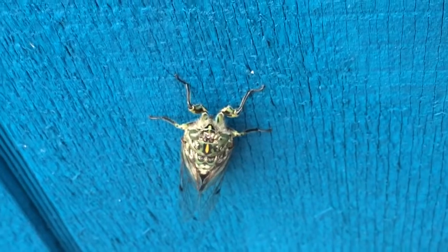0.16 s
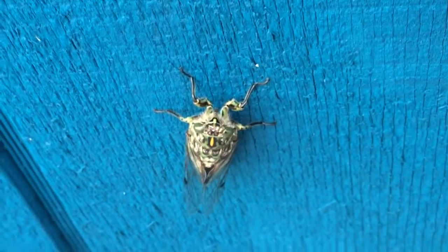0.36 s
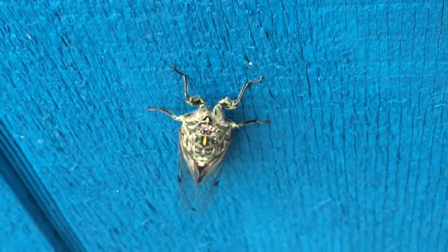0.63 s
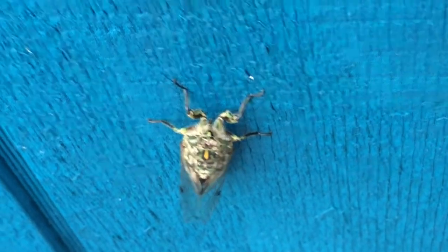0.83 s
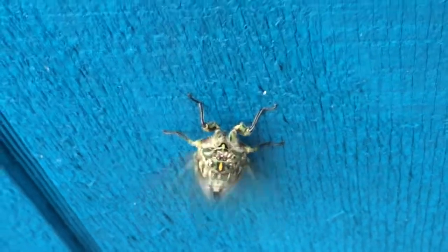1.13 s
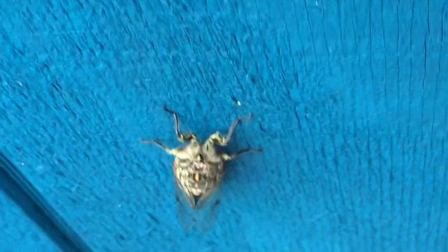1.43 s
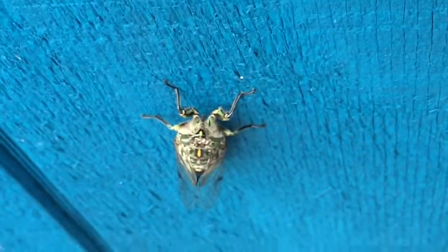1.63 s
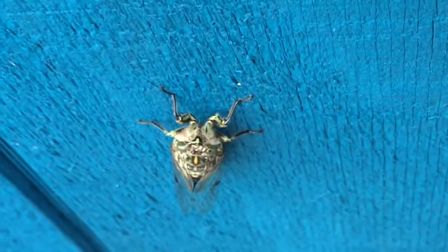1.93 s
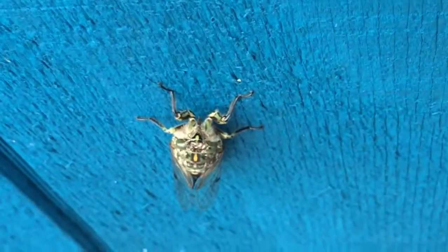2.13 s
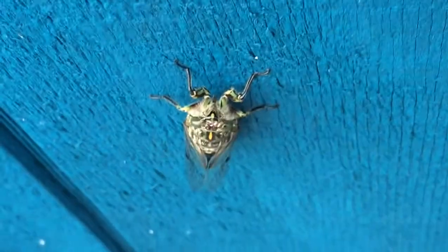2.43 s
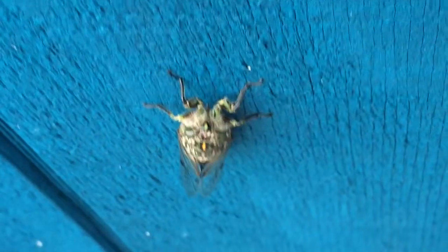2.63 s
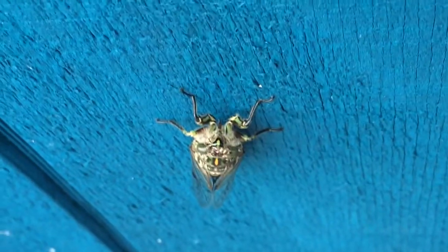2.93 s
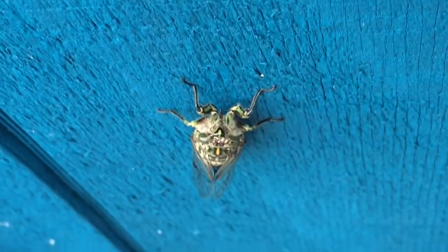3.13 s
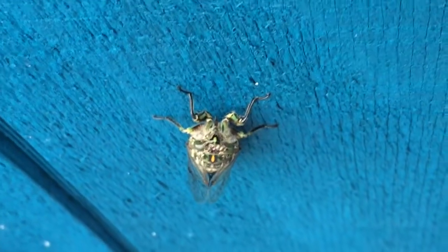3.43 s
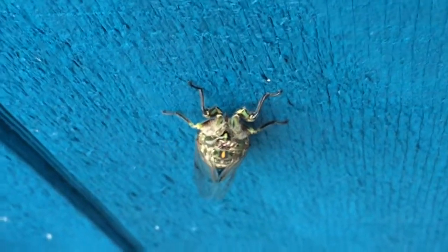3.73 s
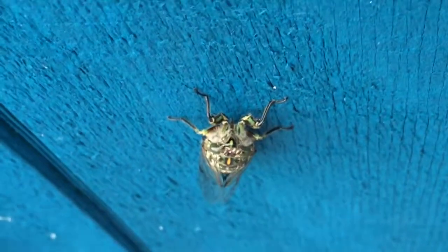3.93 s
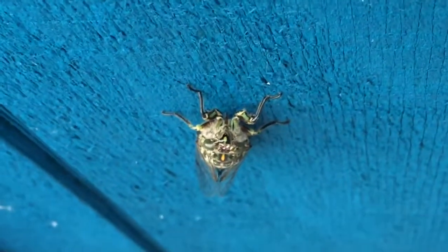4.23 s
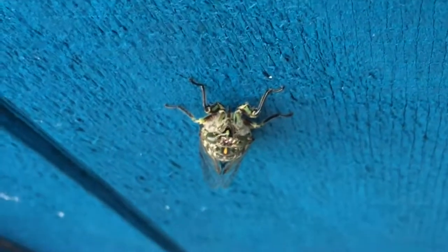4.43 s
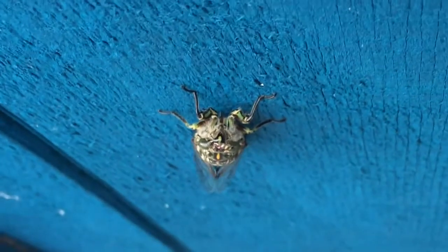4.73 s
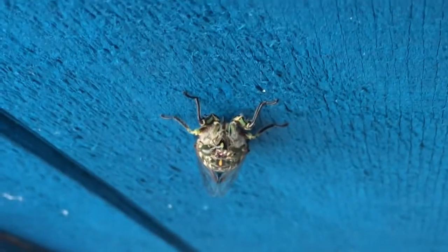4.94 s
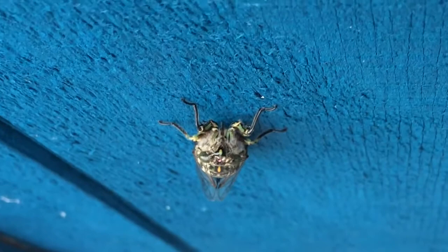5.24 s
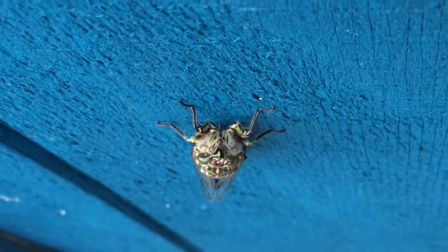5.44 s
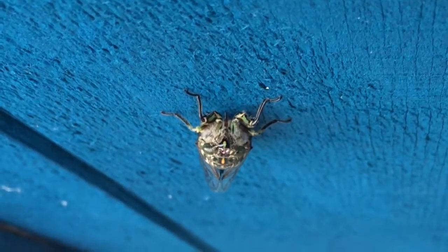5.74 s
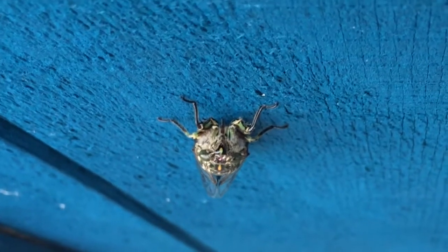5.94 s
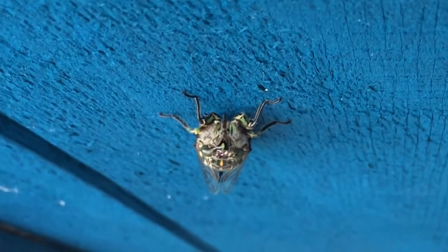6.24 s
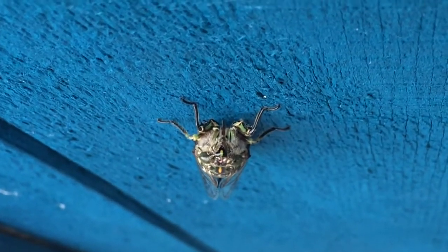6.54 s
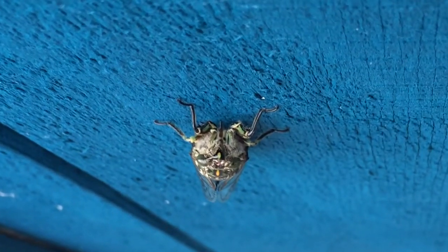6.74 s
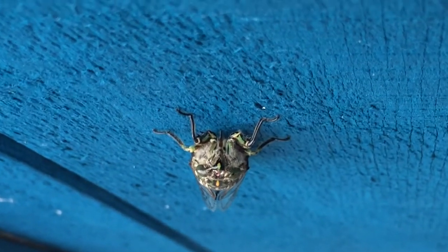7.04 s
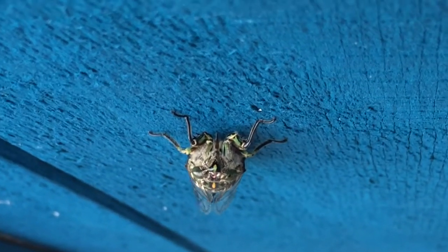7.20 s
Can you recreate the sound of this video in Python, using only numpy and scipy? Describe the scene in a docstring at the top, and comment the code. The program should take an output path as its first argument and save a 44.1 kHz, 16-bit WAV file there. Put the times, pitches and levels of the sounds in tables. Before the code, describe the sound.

Close, shrill cicada song repeats about once a second, rapid ticking building to a short buzz over faint outdoor hiss.

```python
"""Outdoors on a painted board, a cicada sings close to a small microphone, over low air and a far chorus.
Each muscle stroke buckles five tymbal ribs in turn; the clicks ring the air sac, whose pitch climbs as
the abdomen lifts. A phrase builds from lone strokes through runs of mostly three to one long roll, and
the wings flick at its start. A hand bumps the microphone twice; its sound bends under the loud clicks."""
import sys
import numpy as np
from scipy import signal
from scipy.fft import rfft, irfft
from scipy.io import wavfile

SR = 44100
rng = np.random.default_rng(int(sys.argv[2]) if len(sys.argv) > 2 else 0)


def dump(signal):
    """Clip the signal to [-1, 1] and save it as 16-bit WAV at the path in sys.argv[1]."""
    limited = np.clip(np.atleast_2d(signal).T, -1, 1)
    pcm = np.round(limited * 32767).astype(np.int16)
    wavfile.write(sys.argv[1], SR, pcm)


N = 325017

# The colour of the outdoor air. Each row: frequency in Hz, relative spectral level in dB.
AIR_SPECTRUM = [(20, -5), (50, 5), (90, -0.5), (180, -1), (800, -6), (2150, -10), (3400, -42), (5000, -22)]
# Muscle strokes that stand alone. Each row: start in seconds, relative level in dB.
LONE_STROKES = [(0.0106, -13), (0.0356, -11.5), (0.052, -7.0), (0.0749, -10.5), (0.0941, -12.5),
                (0.115, -12), (0.1362, -10), (0.1567, -9.5), (0.1772, -8.5), (0.1971, -9), (0.2176, -7.5),
                (0.238, -8.5), (0.2575, -8.5), (0.2775, -9.0), (0.2991, -7.5), (0.3182, -7.5), (0.3378, -7),
                (0.3585, -10), (0.3751, -7.5), (1.2179, -8.5), (1.2541, -9), (1.2805, -11.5),
                (1.3031, -9.0), (1.323, -8.5), (1.3422, -11), (1.3659, -11), (1.3883, -8.5), (1.407, -11),
                (1.4291, -10.5), (1.4507, -9), (1.4711, -9.5), (1.4912, -10), (1.5135, -9.5),
                (1.5329, -7.5), (1.5533, -9.5), (1.575, -8.5), (1.589, -7.0), (2.3125, -8.5),
                (2.3448, -6.5), (2.3646, -12.0), (2.3908, -11), (2.4101, -9.5), (2.4346, -8),
                (2.4537, -10.0), (2.4717, -11.5), (2.4915, -10.5), (2.5121, -10), (2.5326, -8.5),
                (2.5522, -10), (2.5733, -8.5), (2.5933, -7), (2.6126, -7.5), (2.634, -9.5), (2.6561, -8.0),
                (2.6767, -7), (2.6941, -9.0), (2.7164, -7.5), (3.568, -8.5), (3.6001, -10), (3.624, -13.0),
                (3.65, -11.5), (3.6702, -7.0), (3.6876, -10), (3.7075, -13), (3.73, -11.5), (3.7521, -8.5),
                (3.772, -8.5), (3.7908, -9), (3.812, -9.5), (3.8343, -8.5), (3.854, -8.5), (3.8756, -9),
                (3.8948, -7.5), (3.9145, -8.0), (4.6807, -7), (4.7028, -9), (4.7174, -8.0), (4.7418, -13.5),
                (4.7688, -10), (4.793, -9.0), (4.812, -11.5), (4.8305, -11), (4.8515, -11.5),
                (4.872, -11.0), (4.8927, -11.5), (4.9129, -8.5), (4.9319, -8.5), (4.9528, -9.5),
                (4.9735, -9.5), (4.9917, -10.5), (5.0122, -8.5), (5.0321, -8), (5.0526, -8.0), (5.0723, -8),
                (5.0897, -10.5), (5.1136, -7.5), (5.1306, -6.5), (5.1485, -8.5), (6.0899, -7.5),
                (6.1266, -8.5), (6.1514, -13.5), (6.1754, -12.0), (6.1996, -7.0), (6.2168, -9.0),
                (6.2354, -12), (6.255, -11), (6.2766, -9.5), (6.2968, -7), (6.3162, -9), (6.3361, -9),
                (6.3568, -8.0), (6.377, -8), (6.3958, -9), (6.4158, -8.5), (6.4364, -8.0), (6.4552, -7.5),
                (6.473, -8), (6.4969, -7.0), (6.5135, -7.0), (7.246, -6.5), (7.2804, -8), (7.3056, -12.5),
                (7.3318, -7), (7.356, -8)]
# Short runs and long rolls. Each row: start in seconds, number of strokes, first spacing in ms,
# later spacing in ms, relative level in dB.
STROKE_RUNS = [(0.4016, 2, 11.4, 11.0, -7.0), (0.4479, 3, 10.8, 10.6, -7.0), (0.4985, 3, 10.4, 10.6, -8.0),
               (0.5489, 3, 10.4, 10.8, -8.0), (0.6003, 3, 10.4, 10.8, -8.0), (0.6512, 3, 10.2, 10.8, -7.0),
               (0.7037, 3, 10.0, 10.8, -7.0), (0.7541, 3, 10.4, 10.8, -8.0), (0.8066, 3, 10.0, 10.6, -8.0),
               (0.8567, 3, 10.0, 10.6, -8.0), (0.9084, 3, 10.2, 10.4, -9.0),
               (0.9528, 21, 10.4, 11.07, -7.0), (1.6191, 3, 11.2, 11.4, -9.0),
               (1.6699, 3, 10.6, 10.8, -7.0), (1.7225, 3, 10.6, 10.8, -9.0), (1.7736, 3, 10.4, 10.6, -8.0),
               (1.8248, 3, 10.0, 10.8, -8.0), (1.8768, 3, 10.2, 10.6, -9.0), (1.9289, 3, 10.2, 10.4, -8.0),
               (1.9806, 3, 10.2, 10.8, -8.0), (2.0274, 23, 9.8, 11.07, -7.0), (2.7364, 2, 11.8, 11.0, -8.0),
               (2.7725, 2, 11.4, 11.0, -8.0), (2.8212, 3, 11.0, 10.8, -8.0), (2.8732, 3, 10.4, 10.8, -8.0),
               (2.9238, 3, 10.6, 10.6, -9.0), (2.9768, 3, 10.4, 10.8, -8.0), (3.0285, 3, 9.8, 10.8, -8.0),
               (3.0801, 3, 10.2, 10.8, -8.0), (3.1319, 3, 10.0, 10.6, -8.0), (3.1837, 3, 10.4, 10.6, -10.0),
               (3.2351, 3, 10.0, 10.8, -9.0), (3.2831, 23, 9.4, 11.07, -7.0), (3.9339, 2, 11.2, 11.0, -9.0),
               (3.9749, 3, 11.0, 10.8, -6.0), (4.0263, 3, 10.4, 10.6, -8.0), (4.0774, 3, 10.4, 10.8, -8.0),
               (4.129, 3, 10.4, 10.8, -8.0), (4.1809, 3, 10.2, 10.8, -8.0), (4.2324, 3, 10.2, 10.6, -8.0),
               (4.2842, 3, 10.4, 10.6, -7.0), (4.3355, 3, 10.2, 10.8, -7.0),
               (4.3822, 24, 10.0, 11.07, -7.0), (5.166, 3, 11.0, 10.0, -7.0), (5.214, 3, 10.6, 10.8, -7.0),
               (5.2655, 3, 10.4, 10.6, -8.0), (5.3173, 3, 10.4, 10.4, -8.0), (5.3679, 3, 10.4, 10.6, -7.0),
               (5.4201, 3, 10.2, 10.6, -8.0), (5.4723, 3, 10.2, 10.8, -7.0), (5.5244, 3, 10.4, 10.4, -7.0),
               (5.5776, 3, 10.2, 10.6, -8.0), (5.6305, 3, 10.4, 10.6, -7.0), (5.6825, 3, 10.4, 10.6, -7.0),
               (5.7329, 3, 10.2, 10.6, -7.0), (5.7802, 25, 10.0, 11.11, -7.0),
               (6.5415, 2, 12.0, 11.0, -8.0), (6.5887, 3, 10.6, 11.0, -8.0), (6.6398, 3, 10.8, 10.8, -8.0),
               (6.6902, 3, 10.8, 10.6, -8.0), (6.7412, 3, 10.4, 10.6, -7.0), (6.7919, 3, 10.6, 10.6, -7.0),
               (6.8433, 3, 10.0, 10.6, -7.0), (6.8958, 3, 10.2, 10.8, -7.0), (6.9454, 3, 10.1, 10.7, -7),
               (6.9815, 22, 11.06, 11.06, -7)]
# The five ribs in buckling order. Each row: sac ring, tymbal ring, edge ring and snap, in relative dB.
RIB_LEVELS = [(-5.5, -0.5, -11.5, -5.5), (3, -13, -11.5, 11), (-1.5, 0, -10, -4), (2, -4, -15, 2),
              (-0.5, -8, -20, 5)]
# The song's phrasing. Each row: start, first run, start of the roll and end, all in seconds.
PHRASE_TIMES = [(-.045, .40, .95, 1.19), (1.215, 1.62, 2.03, 2.29), (2.31, 2.74, 3.28, 3.54),
                (3.565, 3.93, 4.38, 4.65), (4.68, 5.17, 5.78, 6.06), (6.09, 6.54, 6.95, 7.23),
                (7.245, 7.7, 8.2, 8.5)]
# How hard the ribs snap. Each entry: one phrase's snap trim in dB.
PHRASE_SNAP_TRIMS = [-41, -40.5, -40, -39, -38, -36, -37]
# The abdomen at a phrase's start, after sinking, at the first run, at the roll, mid roll and at the end.
# Each row: air sac pitch in Hz, tymbal pitch in Hz, relative snap level in dB, slackness from 0 to 1.
ABDOMEN_POSTURES = [(5930, 7640, -26, 0.71), (5305, 7370, -23.5, 0.93), (5995, 7790, -10, 0.65),
                    (6430, 7990, -7.5, 0.41), (7190, 8830, -6, 0.24), (7290, 8900, 2.5, 0.39)]
# Slaps off the board and nearby walls. Each row: delay in ms, gain in dB.
NEAR_ECHOES = [(2.3, -17), (4.2, -24.5), (6.1, -26.5)]
# Wings striking the board. Each row: start in seconds, relative level in dB.
WING_FLICKS = [(0.0545, -27.5), (1.2305, -24.5), (2.3234, -24), (2.4156, -26.5), (3.5826, -26),
               (4.6902, -23), (4.7787, -22), (6.1, -22.5), (6.1816, -25), (7.2597, -23), (7.3398, -24.5)]
# The tones in a wing's tap. Each row: pitch in Hz, relative level in dB, time to fall 60 dB in seconds.
WING_MODES = [(1900, -7.5, 0.0044), (2540, -4, .0015), (3550, 9, 0.0031), (5270, -20, 0.001),
              (7540, 12, 0.0015), (12500, -10, .001)]
# A hand on the microphone. Each row: start in seconds, relative level in dB.
HAND_BUMPS = [(0.368, -40), (7.049, -52)]

AIR_DB, CHORUS_DB = -61.5, -45
CHORUS_HZ, CHORUS_HALF_WIDTH_HZ = 7060, 1440
# Each rib's delay in a lone or opening stroke, and in the later strokes of a run.
OPENING_RIB_MS, LATER_RIB_MS = (0, 3.0, 5.15, 7.1, 9.1), (0, 2.25, 5.25, 7.35, 9.15)
SINK_S = .13   # the abdomen has dropped this long into a phrase
CLICK_T60_S, TAUT_T60_S, AFTER_RING_T60_S, CLICK_RISE_S = .0029, .004, .008, .00016
EDGE_HZ, SHEEN_HZ, MIC_CUTOFF_HZ = 9700, 12600, 16400


def from_db(db):
    """Decibels as a gain."""
    return 10 ** (np.asarray(db) / 20)


def unit_rms(x):
    """The sound scaled to an RMS of one."""
    return x / np.sqrt(np.mean(x ** 2))


def band(x, low_hz, high_hz, order=2):
    """A Butterworth band-pass."""
    return signal.sosfilt(signal.butter(order, [low_hz, high_hz], "band", fs=SR, output="sos"), x)


def rings(at, hz, db, t60, rise_s, samples=300):
    """One damped sine with a rounded attack at each start time, with its own pitch, level and decay."""
    at, hz, db, t60, rise_s = [c[:, None] for c in np.broadcast_arrays(at, hz, db, t60, rise_s)]
    index = np.ceil(at * SR).astype(int) + np.arange(samples)
    t = index / SR - at
    envelope = (1 - np.exp(-t / rise_s)) ** 3 * from_db(db - 60 * t / t60)
    tones = envelope * np.sin(2 * np.pi * hz * t)
    return np.bincount(index.ravel(), tones.ravel(), N + SR)[:N]


def outdoor_bed():
    """A low wash of air under the steady, faint hiss of far cicadas."""
    hz = np.maximum(np.arange(N // 2 + 1) * SR / N, 10)
    air_hz, air_db = np.transpose(AIR_SPECTRUM)
    colour = from_db(np.interp(np.log(hz), np.log(air_hz), air_db))
    air = irfft(rfft(rng.standard_normal(N)) * colour, N)
    chorus = band(rng.standard_normal(N), CHORUS_HZ - CHORUS_HALF_WIDTH_HZ,
                  CHORUS_HZ + CHORUS_HALF_WIDTH_HZ)
    return from_db(AIR_DB) * unit_rms(air) + from_db(CHORUS_DB) * unit_rms(chorus)


def muscle_strokes():
    """The muscle's rhythm: starts in seconds, levels in dB, and 1 where a stroke continues a run."""
    rows = [(start, db, 0) for start, db in LONE_STROKES]
    for start, count, first_ms, later_ms, db in STROKE_RUNS:
        rows.append((start, db, 0))
        rows += [(start + (first_ms + k * later_ms) / 1000, db, 1) for k in range(count - 1)]
    return np.transpose(rows)


def abdomen_posture(at):
    """Sac pitch, tymbal pitch, snap level and slackness as the abdomen sinks and lifts in each phrase."""
    times, rows = [], []
    for (start, runs, roll, end), trim_db in zip(PHRASE_TIMES, PHRASE_SNAP_TRIMS):
        times += [start, start + SINK_S, runs, roll, (roll + end) / 2, end]
        rows += [(sac, tymbal, db + trim_db, slack) for sac, tymbal, db, slack in ABDOMEN_POSTURES]
    return [np.interp(at, times, column) for column in np.transpose(rows)]


def tymbal_clicks():
    """Each buckling rib rings the sac, the tymbal and its stiff edge, with a thin sheen and a snap."""
    start, stroke_db, continues_run = muscle_strokes()
    body, snaps, sheen = np.zeros((3, N))
    for opening_ms, later_ms, rib_levels in zip(OPENING_RIB_MS, LATER_RIB_MS, RIB_LEVELS):
        sac_db, tymbal_db, edge_db, rib_snap_db = rib_levels
        scatter = rng.standard_normal((len(start), 14)).T   # no two clicks alike
        delay_ms = np.where(continues_run, later_ms, opening_ms) + .09 * scatter[0] - .55
        at = start + delay_ms / 1000
        db = stroke_db + 12 + .63 * scatter[1]
        sac_hz, tymbal_hz, snap_db, slack = abdomen_posture(at)
        # A slack sac rings at two uneven pitches and dies fast; a taut one is purer, longer and rounder.
        sac_t60 = TAUT_T60_S + (CLICK_T60_S - TAUT_T60_S) * slack
        rise_s = CLICK_RISE_S * (1.6 - .6 * slack)
        for side, detune, imbalance in ((-1.03, scatter[2], scatter[3]), (1, scatter[4], scatter[5])):
            mode_hz = sac_hz * (1 + slack * (.12 * side + .085 * detune))
            mode_db = db + sac_db - 5 + 2.35 * slack * imbalance
            body += rings(at, mode_hz, mode_db, sac_t60, rise_s, samples=200)
        body += rings(at, tymbal_hz * (1 + .079 * scatter[6]), db + tymbal_db,
                      CLICK_T60_S, rise_s, samples=150)
        body += rings(at, EDGE_HZ * (1 + .066 * scatter[7]), db + edge_db + 3 * scatter[8],
                      CLICK_T60_S, CLICK_RISE_S, samples=150)
        body += rings(at, sac_hz * (1.05 + .1 * scatter[10]), db - 21 + 3 * scatter[11],
                      AFTER_RING_T60_S, CLICK_RISE_S, samples=350)
        sheen += rings(at, SHEEN_HZ * (1 + .076 * scatter[12]), db - 24 - 8 * slack + 3 * scatter[13],
                       AFTER_RING_T60_S / 2, CLICK_RISE_S, samples=200)
        snap_gain = from_db(snap_db + rib_snap_db + 24 + 5.07 * scatter[9])
        snap_index = np.round(at * SR).astype(int) + 18   # a spike near the crest of the ring
        snaps += np.bincount(snap_index, snap_gain, N + SR)[:N]
    body = signal.sosfilt(signal.butter(14, 10700, fs=SR, output="sos"), band(body, 3300, 13000))
    snaps = band(band(snaps, 58, 2140, order=1), 38, 4300, order=1)
    return body + band(sheen, 11520, 16400, order=5) + snaps


def with_reflections(x):
    """The board and nearby walls add a few tight echoes and a faint diffuse tail."""
    t = np.arange(SR // 4) / SR
    tail = from_db(-30.5 - 60 * t / .03) + from_db(-55 - 60 * t / .081)
    response = rng.standard_normal(len(t)) * tail * (t > .002)
    for ms, db in NEAR_ECHOES:
        response[round(ms * SR / 1000)] += from_db(db)
    return x + signal.fftconvolve(x, response)[:N]


def wing_flicks():
    """A wing taps the board twice, a millisecond apart, and rustles briefly."""
    start, flick_db = np.transpose(WING_FLICKS)
    at, db = np.r_[start + .001, start + .002], np.r_[flick_db, flick_db - 3]
    taps = np.zeros(N)
    for hz, mode_db, t60 in WING_MODES:
        scattered_hz = hz * (1 + .06 * rng.standard_normal(len(at)))
        taps += rings(at, scattered_hz, db + mode_db + 7, t60, rise_s=.00005)
    rustle_envelope = np.abs(rings(at, hz=50, db=db + 6.5, t60=.026, rise_s=.00031, samples=800))
    return taps + rustle_envelope * band(rng.standard_normal(N), 1800, 8300, order=1)


def hand_bumps():
    """A hand sends soft, low thuds through the microphone's casing."""
    at, db = np.transpose(HAND_BUMPS)
    return rings(at, hz=53, db=db + 4, t60=.11, rise_s=.0059, samples=5000)


def scene():
    """The cicada and its reflections up front, hand bumps and the outdoor bed beneath, in mono."""
    cicada = with_reflections(tymbal_clicks() + wing_flicks())
    return (cicada + hand_bumps() + outdoor_bed())[None]


def record(dry):
    """A lopsided microphone rounds the peaks, adds a low buzz and a high octave, and cuts the top."""
    rounded = .81 * np.tanh(dry / .77)
    buzz = band(rounded ** 2, 172, 1350, order=1)
    octave = band(rounded ** 2, 12400, 17400, order=7)
    coloured = rounded - from_db(-17) * buzz - from_db(-15) * octave
    shelved = signal.sosfilt(signal.ellip(6, .3, 22, 15350, fs=SR, output="sos"), coloured)
    return signal.sosfilt(signal.ellip(10, .3, 75, MIC_CUTOFF_HZ, fs=SR, output="sos"), shelved)


dry = scene()
out = record(dry)
dump(out)
```